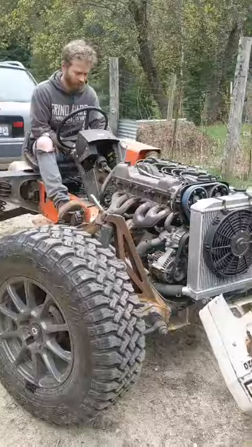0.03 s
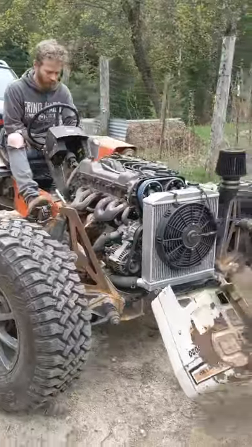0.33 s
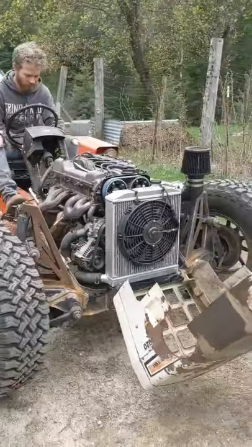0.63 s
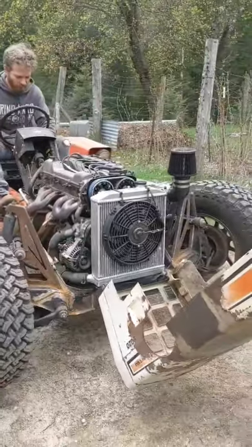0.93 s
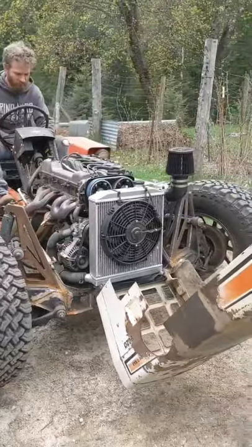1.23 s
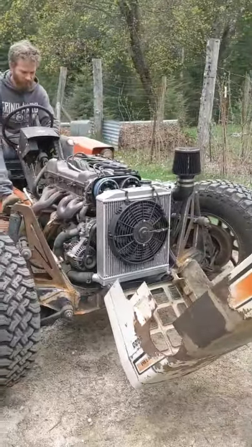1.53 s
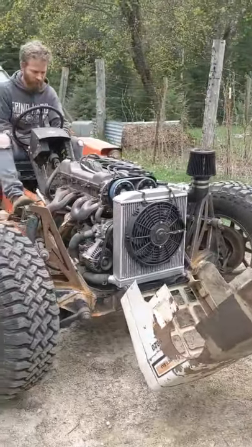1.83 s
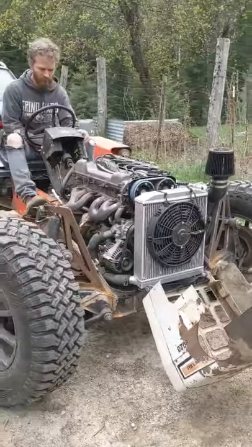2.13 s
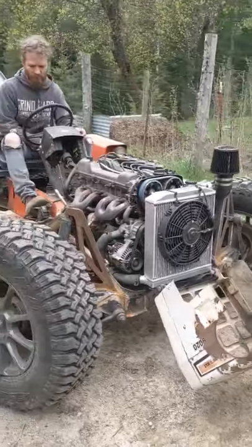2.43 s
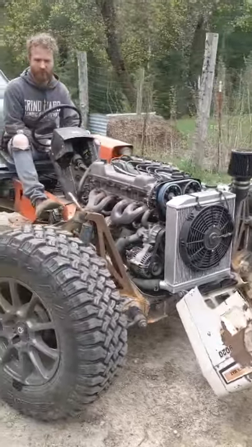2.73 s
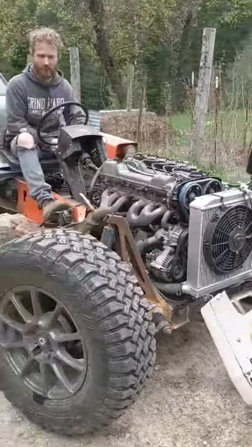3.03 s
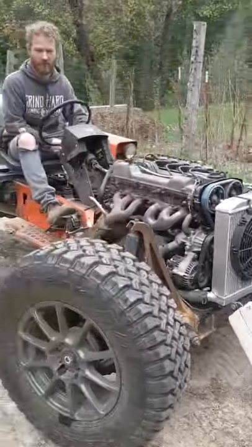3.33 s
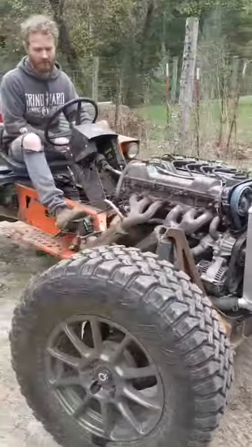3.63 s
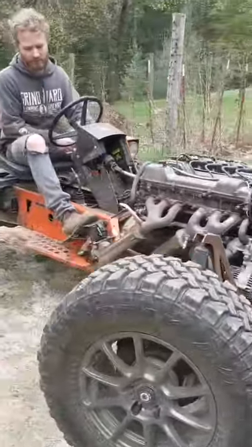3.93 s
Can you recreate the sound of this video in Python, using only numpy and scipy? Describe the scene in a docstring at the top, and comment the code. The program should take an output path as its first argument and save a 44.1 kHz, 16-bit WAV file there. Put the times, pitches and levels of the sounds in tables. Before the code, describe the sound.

A large engine cranks briefly, catches with a few bangs and idles loudly.

```python
"""A switch clicks in a quiet yard, then a starter grinds through two compressions of a cold engine.
The bare six-cylinder stands a few metres from one microphone. Its first charges bang out of the open
exhaust, then it flares and settles to a loud, lumpy idle: each firing puffs into the ringing pipe and
rattles the block over a low hum. The loudest peaks lean on the recorder's limiter."""
import sys
import numpy as np
from scipy import signal
from scipy.fft import rfft, irfft
from scipy.io import wavfile
from scipy.ndimage import uniform_filter1d, minimum_filter1d

SR = 44100
rng = np.random.default_rng(int(sys.argv[2]) if len(sys.argv) > 2 else 0)


def persist_wave(psi):
    """Save psi, clipped to +-1, as 16-bit WAV."""
    counts = np.round(np.clip(psi, -1, 1) * 32767).astype(np.int16)
    wavfile.write(sys.argv[1], SR, np.atleast_2d(counts).T)


N = 176400
TIME = np.arange(N) / SR


def from_db(db):
    """Decibels to gain."""
    return 10 ** (np.asarray(db) / 20)


def rms_one(x):
    """Scale to unit rms."""
    return x / np.sqrt(np.mean(x ** 2) + 1e-20)


def in_time(rows):
    """Each column after the first (time_s) as a curve in time."""
    time_s, *columns = np.transpose(rows)
    return [np.interp(TIME, time_s, column) for column in columns]


def noise(spectrum):
    """Unit-rms noise with the given colour."""
    hz, db = np.transpose(spectrum)
    bin_hz = np.maximum(np.arange(N // 2 + 1) * SR / N, 1)
    colour = from_db(np.interp(np.log(bin_hz), np.log(hz), db, left=-80))
    return rms_one(irfft(rfft(rng.standard_normal(N)) * colour, N))


def drift(rate_hz):
    """A random wander of unit rms."""
    lowpass = signal.butter(2, rate_hz, fs=SR, output="sos")
    return rms_one(signal.sosfilt(lowpass, rng.standard_normal(2 * N))[N:])


def impulses(start_s, gain):
    """Impulses at the given times."""
    return np.bincount(np.clip(np.asarray(start_s) * SR, 0, N - 1).astype(int), gain, N) + 1e-18


def dying(x, decay_s):
    """Every impulse becomes an exponential decay."""
    return signal.lfilter([1], [1, -np.exp(-1 / (decay_s * SR))], x)


def swelling(x, attack_s, decay_s):
    """Every impulse becomes a rounded rise and a decay."""
    return dying(dying(x, decay_s), attack_s) / (attack_s * SR)


def resonate(x, hz, width_hz):
    """A steep resonance whose centre may move."""
    turn = np.exp(2j * np.pi * np.cumsum(hz + np.zeros(N)) / SR)
    lowpass = signal.butter(2, width_hz / 2, fs=SR, output="sos")
    return 2 * (turn * signal.sosfilt(lowpass, x / turn)).real


# Background of the yard: frequency_hz, relative_db
YARD_SPECTRUM = [(25, -5), (50, 4.5), (95, 4), (140, -6.5), (250, -9), (950, -12), (1400, -18.5),
                 (4500, -21.5), (5700, -18), (7000, -23), (9800, -22)]

def yard():
    """A faint, low rumble around the microphone."""
    return from_db(-63) * noise(YARD_SPECTRUM) * (TIME > .09)


# Whirr before the starter: time_s, level_db
WHIRR_LEVEL = [(.75, -95), (.785, -64), (.9, -70), (.95, -95)]

def whirr():
    """A brief, faint band of high noise."""
    colour = [(1200, -26), (2200, 16.5), (5500, 10.5), (9800, -4.5)]  # frequency_hz, relative_db
    return from_db(in_time(WHIRR_LEVEL)[0]) * noise(colour)


# Switch, relay and pinion engaging: start_s, level_db, decay_s
SWITCH_CLICKS = [(.221, -52, 0.022), (.85, -80, .004), (.912, -29.5, 0.017), (0.931, -39, 0.012)]
# Their bright colour: frequency_hz, relative_db
CLICK_SPECTRUM = [(300, -12), (1500, -5), (3500, 11), (6000, 10), (9800, 0.5)]

def switchgear():
    """Metal parts snap together in short clicks."""
    strikes = sum(dying(impulses([s], [from_db(db)]), decay_s) for s, db, decay_s in SWITCH_CLICKS)
    return strikes * noise(CLICK_SPECTRUM)


# Starter loudness: time_s, level_db
STARTER_LEVEL = [(.885, -74), (.902, -42), (.935, -28.5), (.955, -33.5), (1.0, -32), (1.11, -31),
                 (1.15, -38.5), (1.185, -29.5), (1.24, -30.5), (1.268, -38), (1.31, -41.5), (1.36, -50)]
# Teeth meshing, slowed by each compression: time_s, rate_hz
TOOTH_RATE = [(.89, 700), (.935, 1080), (1.0, 1200), (1.06, 1060), (1.11, 960), (1.15, 900), (1.18, 1420),
              (1.24, 1210), (1.32, 980)]
# Gear whine: tooth_rate_multiple, relative_db
WHINE_TONES = [(.45, -14), (.68, -8), (1, 0), (2, -7), (3, -14)]
# Gear grind: frequency_hz, relative_db
GRIND_SPECTRUM = [(120, -6), (300, -17.5), (600, -6.5), (750, -20), (950, -0.5), (1300, -8), (1550, -11),
                  (1900, -10.5), (2500, -14), (4400, -15), (6300, -24), (9800, -24.5)]

def starter():
    """The pinion whines and grinds on the flywheel's teeth until the engine catches."""
    teeth = np.cumsum(in_time(TOOTH_RATE)[0] * (1 + .027 * drift(120))) / SR
    whine = sum(from_db(db + 2.2 * drift(80)) * np.sin(2 * np.pi * multiple * teeth)
                for multiple, db in WHINE_TONES)
    meshing = 1 + 0.4 * np.cos(2 * np.pi * teeth)
    grind = rms_one(noise(GRIND_SPECTRUM) * from_db(2 * drift(90)) * meshing)
    engaged = (TIME > .88) & (TIME < 1.36)
    return engaged * from_db(in_time(STARTER_LEVEL)[0]) * (from_db(-4.5) * whine + from_db(-3.5) * grind)


# Two compression thumps, then the first charges to fire: start_s, boom_db, bark_db, crack_db
FIRST_CHARGES = [(1.145, -24.5, -52, -60), (1.265, -27.5, -55, -57), (1.32, -11, -24, -23.5),
                 (1.354, -6, -13, -11.5), (1.422, -3, 2.5, -4), (1.448, 2, -15.5, -18),
                 (1.47, -4.5, 1.5, -9), (1.493, -1.5, -10, -22), (1.508, -10, -17, -17),
                 (1.549, -10.5, -4, -9), (1.581, -31, -9, -26), (1.615, -11.5, -13.5, -22),
                 (1.651, -19, -4, -18), (1.679, -34, -18, -27.5), (1.713, -32, -28, -28),
                 (1.741, -24, -8.5, -25.5), (1.77, -35, -12, -41), (1.821, -40, -11, -29)]
# What they ring in the cold pipe: pitch_hz, width_hz, relative_db
COLD_PIPE_MODES = [(258, 131, -10), (436, 27, -36), (547.6, 80, 1.5), (891.6, 26, -8), (1315, 89, -17.5)]
# Gas cracking out of the pipe: frequency_hz, relative_db
CRACK_SPECTRUM = [(410, -26), (700, 3.5), (1140, -7), (2180, -4.5), (2630, -13), (3010, -5.5),
                  (4780, -15.5), (9170, -16.5), (9800, -31.5), (12700, -67), (21600, -120)]

def first_fires(boom_hz=99, boom_t60_s=0.26, attack_s=0.0029):
    """Uneven explosions: a low boom, a bark of the pipe and a sharp crack of gas."""
    start_s, boom_db, bark_db, crack_db = np.transpose(FIRST_CHARGES)
    radius, angle = from_db(-60 / (boom_t60_s * SR)), 2 * np.pi * boom_hz / SR
    thumps = impulses(start_s, from_db(boom_db))
    boom = signal.lfilter([0, -np.sin(angle)], [1, -2 * radius * np.cos(angle), radius ** 2], thumps)
    kicks = impulses(start_s, from_db(bark_db))
    bark = 0
    for hz, width_hz, db in COLD_PIPE_MODES:
        turn = np.exp(2j * np.pi * (hz * TIME + np.cumsum(drift(42)) * width_hz / 2 / SR))
        bark += from_db(db) * (turn * swelling(kicks / turn, attack_s, decay_s=0.0088)).imag
    crack_envelope = swelling(impulses(start_s, from_db(crack_db)), attack_s, decay_s=0.0079)
    return boom + bark + crack_envelope * noise(CRACK_SPECTRUM)


# Mechanical hiss of the bare engine: frequency_hz, relative_db
HISS_SPECTRUM = [(30, 4.5), (60, 14.5), (200, 9.5), (750, 5.5), (1050, 8), (1300, 4), (1900, 2),
                 (2450, -2.5), (3200, -1.5), (4000, -4), (5000, -7), (5700, -5), (6700, -14.5),
                 (7600, -5.5), (9800, -13)]
# Ringing of the block: pitch_hz, width_hz, relative_db
BLOCK_MODES = [(1213, 72, -28.5), (1366, 63, -22.5), (1572, 34, -29.5), (1797, 35, -20.5),
               (2135, 20, -30.5), (3124, 53, -25), (3328, 63, -26)]

def block_rattle(firing_s, hiss_db):
    """A steady hiss surges at each firing and rings the engine block."""
    surges = dying(impulses(firing_s, from_db(hiss_db)), decay_s=0.025)
    hiss = rms_one((1 + surges) * noise(HISS_SPECTRUM))
    ringing = sum(from_db(db) * rms_one(resonate(hiss, hz, width)) for hz, width, db in BLOCK_MODES)
    return rms_one(hiss + ringing)


# Exhaust hum: time_s, then level_db for each of HUM_ORDERS
HUM_LEVELS = [(1.299, -99, -103, -59, -96, -85, -83, -81), (1.44, -41, -46, -15.5, -21.5, -33, -46.5, -47),
              (1.648, -42, -56, -15.5, -18.5, -20, -42, -42), (1.75, -26, -44, -13, -45, -43.5, -47, -41),
              (1.862, -22, -31, -18.5, -34, -30, -55, -33.5),
              (2.0, -17.5, -21.5, -18.5, -34, -28, -29, -43),
              (2.249, -19.5, -23.5, -19, -30, -30.5, -29.5, -32),
              (2.55, -23, -27.5, -16, -34, -27, -36, -28.5),
              (2.948, -25, -30, -21.5, -41.5, -27.5, -49.5, -30), (4, -24, -37, -22, -33.5, -31, -43, -24)]
HUM_ORDERS = (1, 1.5, 2, 2.5, 3, 3.5, 5)

def exhaust_hum(firing_count):
    """The exhaust hums at multiples of the firing rate, their phases staggered."""
    return sum(from_db(db) * np.sqrt(2) * np.sin(2 * np.pi * order * firing_count + 0.6515 * k * k)
               for k, (order, db) in enumerate(zip(HUM_ORDERS, in_time(HUM_LEVELS))))


# Main resonance of the exhaust: time_s, pitch_hz
BARK_PITCH = [(1.3, 613), (2.0, 533), (2.4, 505), (2.9, 494), (4, 465)]
# Its other resonances: pitch_hz, width_hz, relative_db
PIPE_MODES = [(167, 38, 1.5), (296.3, 61, -12), (440.2, 18.3, 0.5), (565, 38.6, 0.5), (930, 42.6, -14.5)]

def exhaust_bark(arrival_s, bark_db, roughness=.35, echo_s=0.005993, echo_gain=0.39):
    """Rough puffs of gas echo once in the open pipe and ring its resonances."""
    pulses = impulses(arrival_s, from_db(bark_db))
    rush = dying(pulses, decay_s=0.0071) * rng.standard_normal(N)
    puffs = rms_one(pulses) + roughness * rms_one(rush)
    puffs += echo_gain * np.interp(TIME - echo_s, TIME, puffs)
    main_ring = resonate(puffs, in_time(BARK_PITCH)[0], width_hz=91.5)
    other_rings = sum(from_db(db) * resonate(puffs, hz, width) for hz, width, db in PIPE_MODES)
    return rms_one(main_ring + other_rings)


# Engine speed, flaring and settling: time_s, firing_rate_hz
FIRING_RATE = [(1.42, 38.0), (1.5, 50.0), (1.66, 59.9), (1.74, 70.5), (1.85, 82.82), (1.97, 89.55),
               (2.17, 91.98), (2.33, 89.89), (2.58, 85.87), (2.79, 83.0), (2.98, 80.64), (3.2, 81.06),
               (3.67, 82.58), (4.0, 82.01)]
# Cylinders in firing order: relative_bark_db, relative_hiss_db, header_travel_s
CYLINDER_BALANCE = [(0.5, 13, 0.00083), (15.5, -4.5, 0.00097), (-23.5, 14.5, 0.001), (16.5, 12.5, 0.00042),
                    (11, 9, 0.0012), (16.5, -20.5, 0.00064)]
# The running engine from a few metres: time_s, bark_db, rattle_db
ENGINE_LEVELS = [(1.3, -66, -49), (1.38, -33, -31), (1.55, -30, -27.5), (1.74, -26.5, -33),
                 (1.95, -18, -31.5), (2.25, -18, -36.5), (2.8, -17, -38), (4, -16, -38.5)]

def running_engine(catch_s=1.33, cycle_start_s=1.651, jitter_s=.00013):
    """Six unequal cylinders fire in turn, which makes the idle lumpy."""
    firing_count = np.cumsum(in_time(FIRING_RATE)[0]) / SR
    firing_count -= np.interp(cycle_start_s, TIME, firing_count)
    firings = np.flatnonzero(np.diff(np.floor(firing_count))) + 1
    cylinder = np.floor(firing_count[firings]).astype(int) % len(CYLINDER_BALANCE)
    bark_db, hiss_db, travel_s = np.array(CYLINDER_BALANCE)[cylinder].T
    time_scatter, bark_scatter, hiss_scatter = rng.standard_normal((len(firings), 3)).T
    bark = exhaust_bark(TIME[firings] + travel_s + jitter_s * time_scatter, bark_db + 1.2 * bark_scatter)
    rattle = block_rattle(TIME[firings], hiss_db + 2.5 * hiss_scatter)
    bark_gain, rattle_gain = from_db(in_time(ENGINE_LEVELS))
    return (exhaust_hum(firing_count) + bark_gain * bark + rattle_gain * rattle) * (TIME > catch_s)


def scene():
    """The cold start over the quiet of the yard, in mono from a few metres."""
    return (yard() + switchgear() + whirr() + starter() + first_fires() + running_engine())[None]


def record(dry):
    """The recorder cuts the deepest bass, holds the peaks with a fast limiter and cuts the top."""
    ceiling, release_db_per_s, lookahead_s = .49, 242.5, 0.0032
    dry = signal.sosfilt(signal.butter(2, 35, "high", fs=SR, output="sos"), dry)
    over_db = 20 * np.log10(np.maximum(np.abs(dry[0]) / ceiling, 1))
    release_db = release_db_per_s * TIME
    held_db = np.maximum.accumulate(over_db + release_db) - release_db
    window = int(lookahead_s * SR)
    gain = uniform_filter1d(minimum_filter1d(from_db(-held_db), window), window)
    return signal.sosfilt(signal.ellip(12, .1, 80, 9850, fs=SR, output="sos"), dry * gain)


dry = scene()
out = record(dry)
persist_wave(out)
```